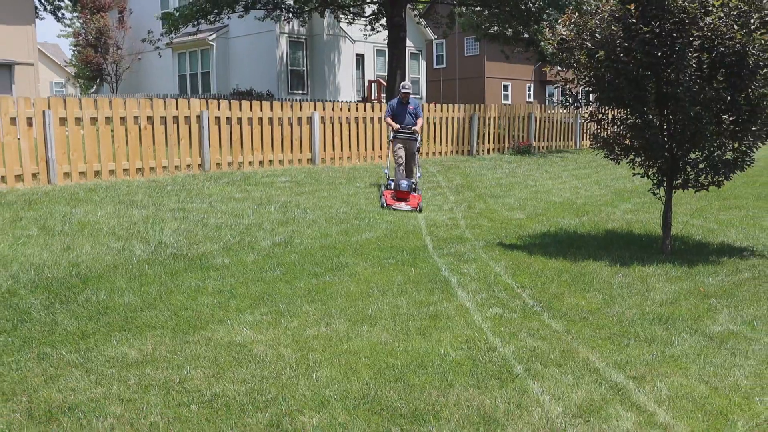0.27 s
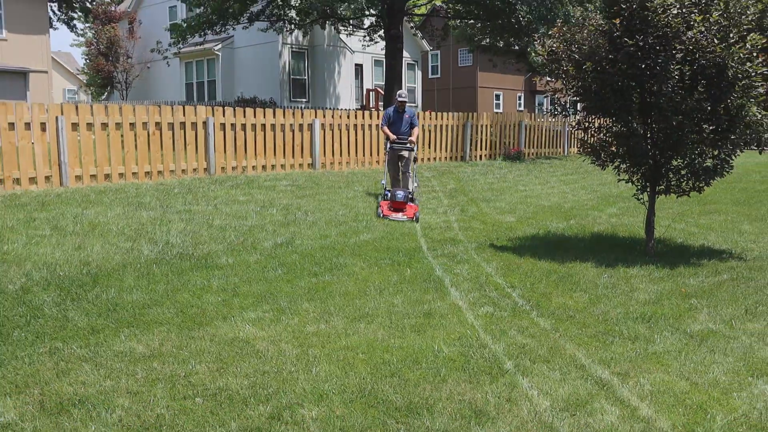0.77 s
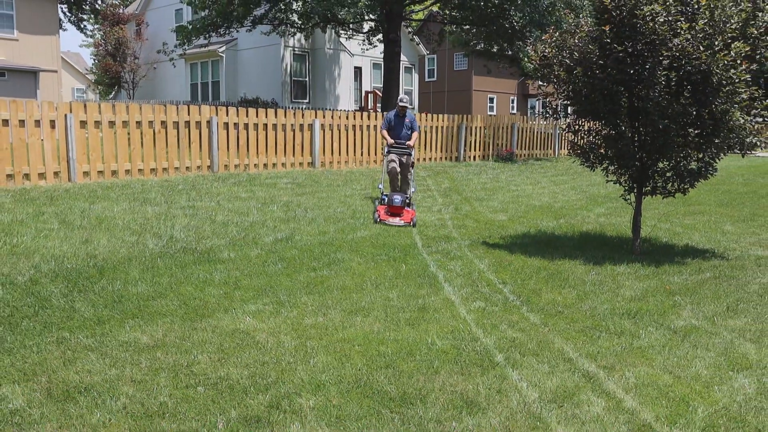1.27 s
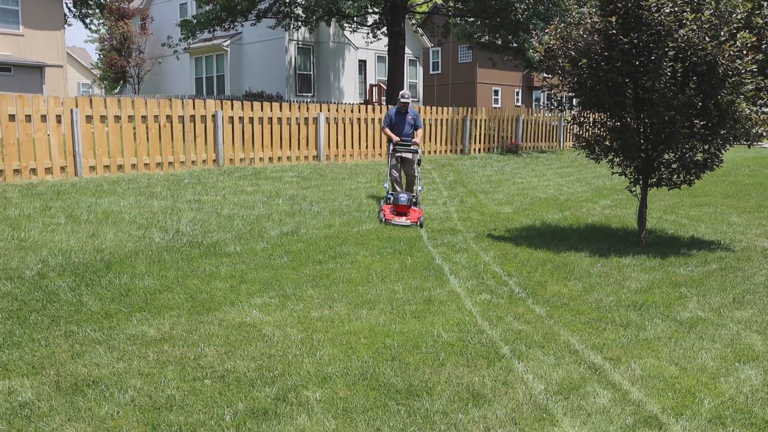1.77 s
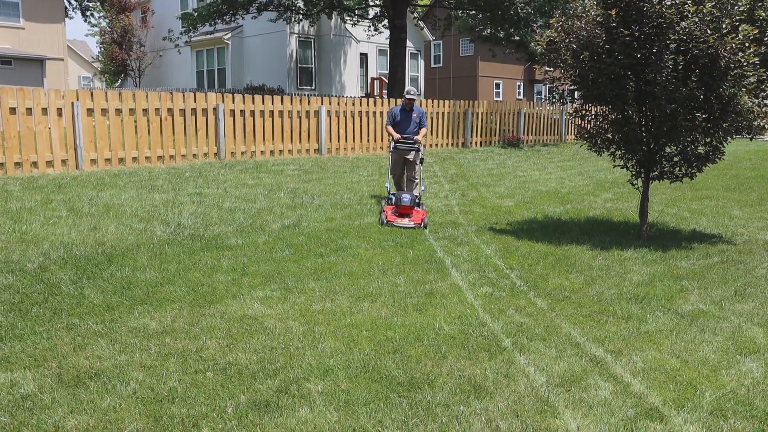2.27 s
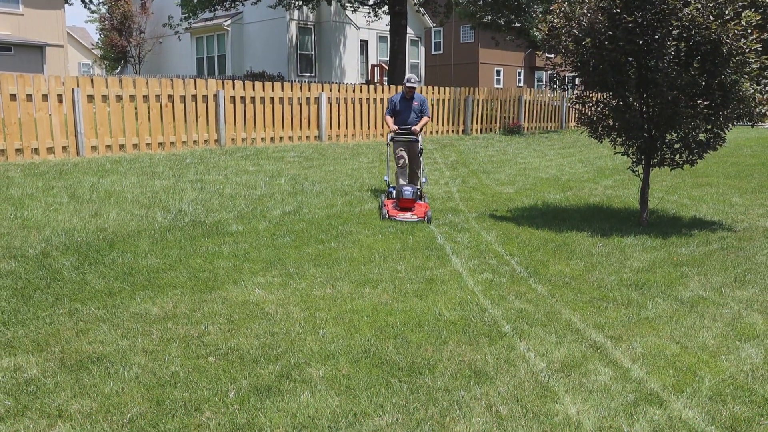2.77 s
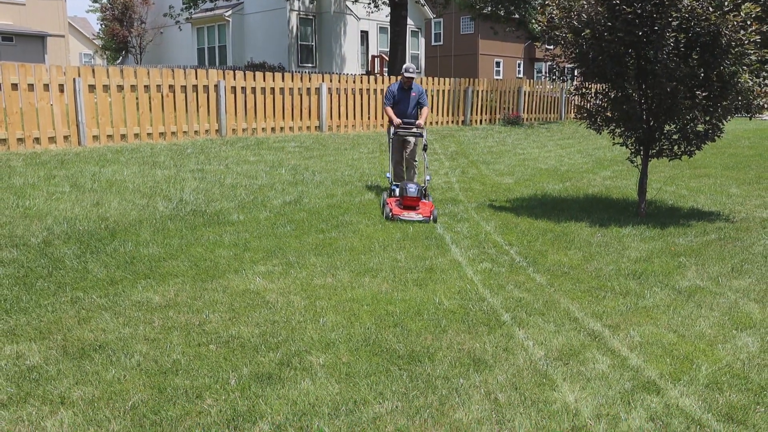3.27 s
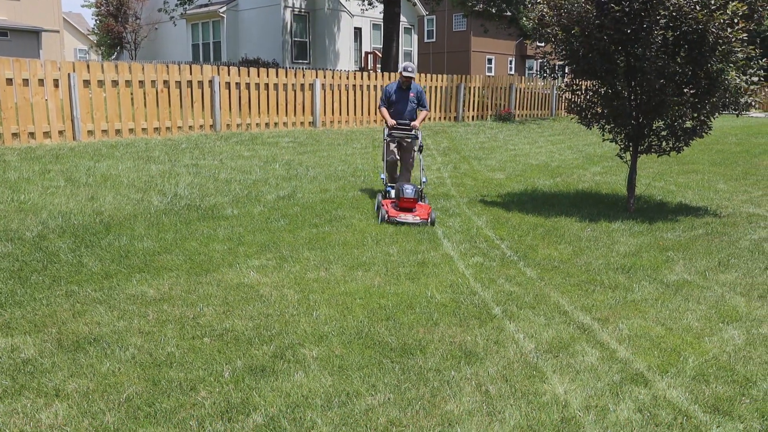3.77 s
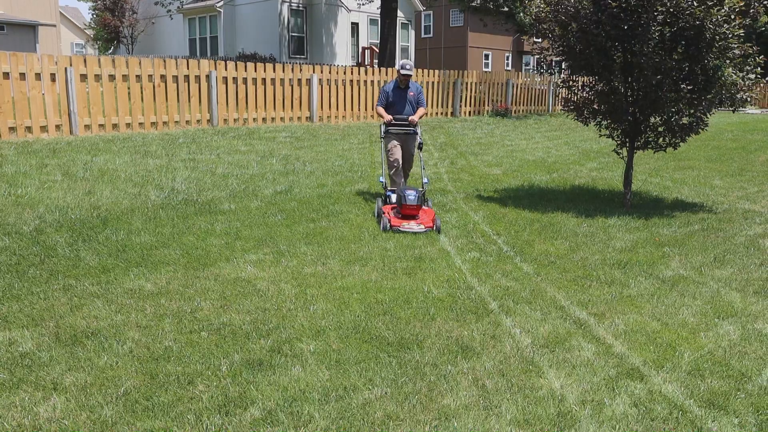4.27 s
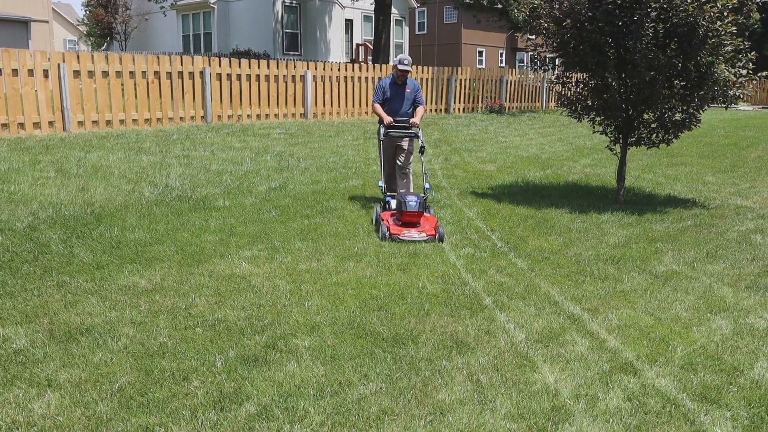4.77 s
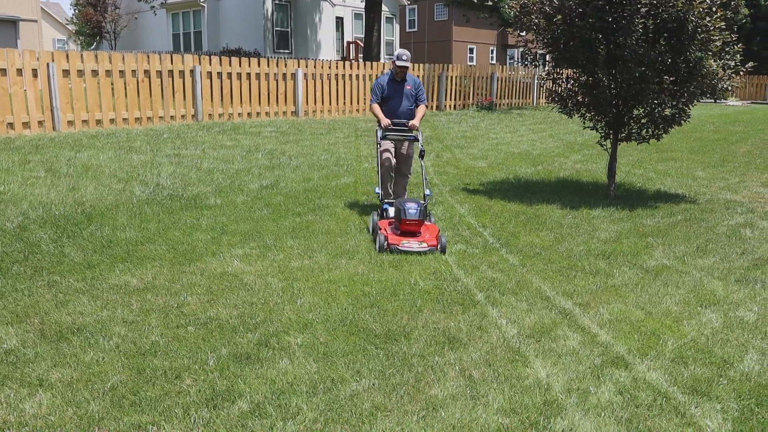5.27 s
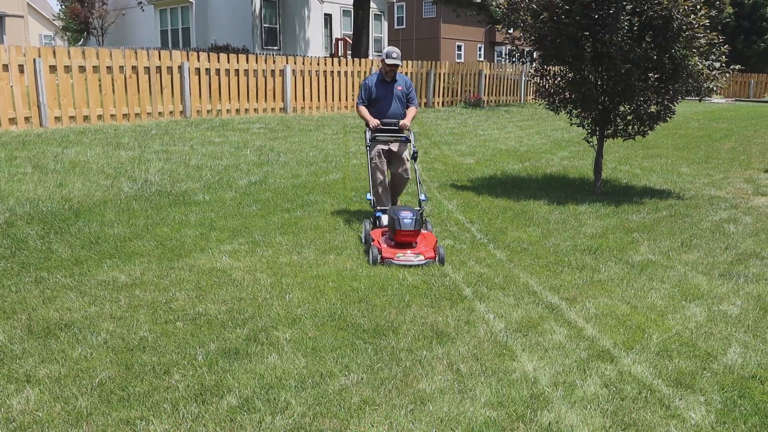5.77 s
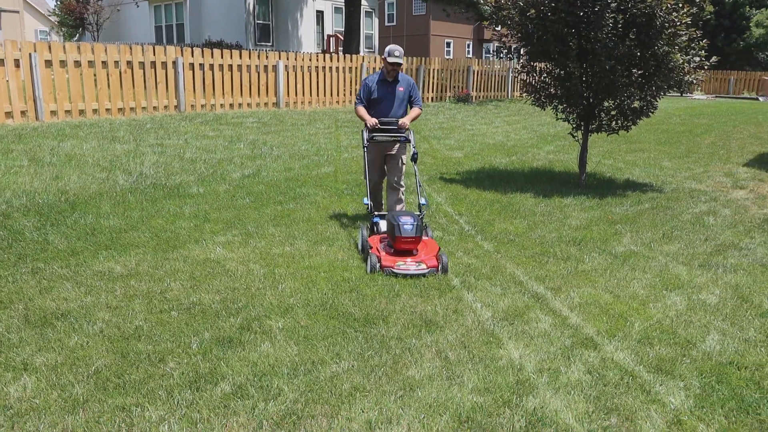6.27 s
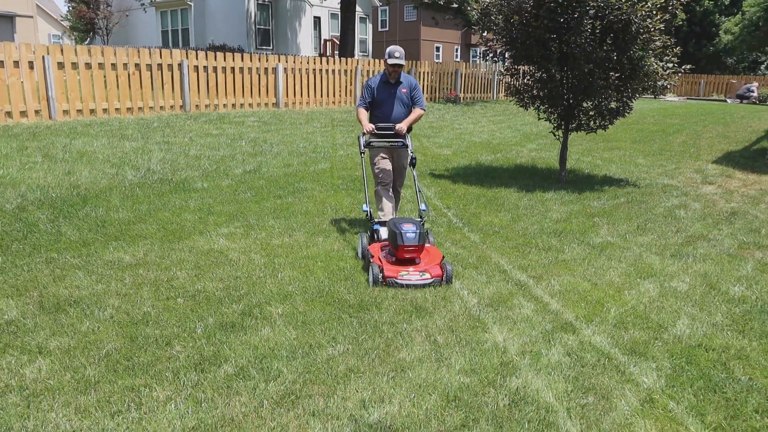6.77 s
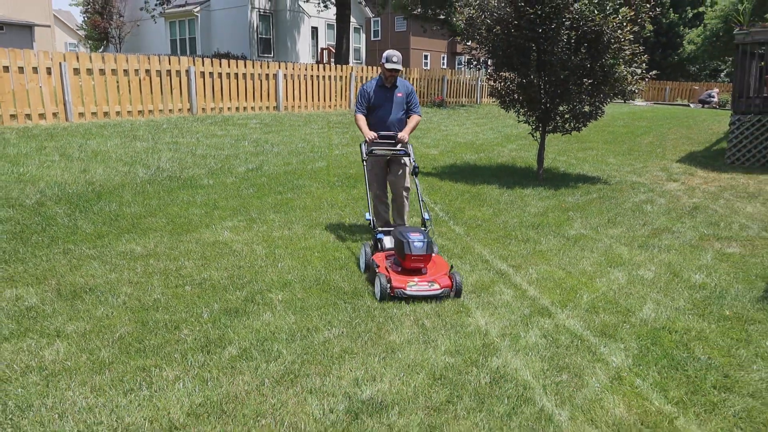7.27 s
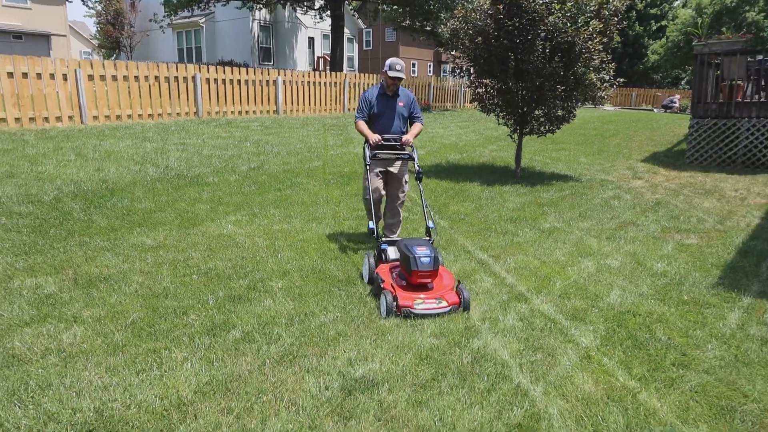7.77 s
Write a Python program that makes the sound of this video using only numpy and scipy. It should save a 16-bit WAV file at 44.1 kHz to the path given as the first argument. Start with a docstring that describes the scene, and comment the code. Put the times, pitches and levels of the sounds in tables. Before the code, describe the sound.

Steady blade hum and airy, shredding roar of an electric mower coming nearer across a back lawn, with low wind thumps and occasional twig knocks.

```python
"""The blade hum and rough, rasping cutting of a battery mower grow louder as it is pushed over a back lawn.
The hum is a stack of tones locked to the blade, with a motor whine above; its pitch dips a little at times.
Noise pulsing with the blade makes the roar of air under the deck, the shredding and the spray of clippings.
Twigs knock, stems snap, puffs of wind buffet the microphone, and a faint steady drone lies under it all."""
import sys
import numpy as np
from scipy import signal
from scipy.fft import rfft, irfft, next_fast_len
from scipy.io import wavfile
from scipy.ndimage import uniform_filter1d, map_coordinates

SR = 44100
rng = np.random.default_rng(int(sys.argv[2]) if len(sys.argv) > 2 else 0)


def log_audio(samples):
    """Write samples as a 16-bit WAV file to the path given in sys.argv[1]."""
    # one column per channel
    frames = np.atleast_2d(samples).T
    # limit to full scale, then quantise
    limited = np.clip(frames, -1, 1)
    pcm = np.round(limited * 32767).astype(np.int16)
    wavfile.write(sys.argv[1], SR, pcm)


N = 353682  # length in samples, about 8 seconds


def amp(db):
    """Turn decibels into a gain."""
    return 10 ** (np.asarray(db) / 20)


def unit(x):
    """Scale x to an rms (average strength) of 1."""
    return x / np.sqrt(np.mean(x ** 2) + 1e-20)


def along(points, hz):
    """Read a table of (Hz, value) points at any frequency, on a log frequency axis."""
    point_hz, value = np.transpose(points)
    return np.interp(np.log(hz + 1), np.log(point_hz + 1), value)


def curves(rows):
    """Draw straight lines between the rows: one curve for each column after the time."""
    seconds, *columns = np.transpose(rows)
    return [np.interp(np.arange(N) / SR, seconds, column) for column in columns]


def wobble(rate):
    """A smooth random curve around zero, drawn through `rate` random points a second."""
    knots = rng.standard_normal(int(N * rate / SR) + 4)
    return map_coordinates(knots, [np.arange(N) * rate / SR])


def bell(s, length):
    """A smooth swell of height 1 at time s; `length` seconds is its width at about a third of that height."""
    return np.exp(-(2 * (np.arange(N) / SR - s) / length) ** 2)


def filtered(x, response):
    """Filter x by a gain that depends on frequency."""
    m = next_fast_len(N + 8192)
    hz = np.fft.rfftfreq(m, 1 / SR)
    return irfft(rfft(x, m) * response(hz), m)[..., :N]


def coloured(x, spectrum):
    """Shape x by a table of (Hz, relative dB), then scale it to rms 1."""
    return unit(filtered(x, lambda hz: amp(along(spectrum, hz))))


def tone(angle, scatter, rate):
    """A steady tone plus its wavering copy, scattered by fence and moving air."""
    waver = wobble(rate) + 1j * wobble(rate)
    partial = (1 + scatter * waver) * np.exp(1j * angle)
    return unit(partial.real)


def patchy_noise(depth_db):
    """Two noises whose shared gain drifts in patches of frequency and time."""
    noise = signal.stft(rng.standard_normal((2, N)), nperseg=512)[2]
    field = rng.standard_normal(noise.shape[1:])
    field = uniform_filter1d(field, size=10, axis=0)  # smooth over frequency
    field = uniform_filter1d(field, size=8, axis=1)  # smooth over time
    patchy = noise * amp(depth_db * unit(field))
    return unit(signal.istft(patchy, nperseg=512)[1][:, :N])


def crackle(rate, scatter_db):
    """Tiny clicks of uneven size at random moments, on average `rate` a second."""
    hit = rng.random(N) < rate / SR
    size = amp(scatter_db * np.minimum(rng.exponential(size=N), 4))
    sign = rng.choice([-1, 1], (2, N))
    return unit(hit * size * sign)


def chop(angle, once, twice, thrice):
    """A gain that rises and falls with each blade pass, as air and grass are struck in bursts."""
    pulse = once * np.cos(angle) + twice * np.cos(2 * angle) + thrice * np.cos(3 * angle)
    return unit(np.exp(pulse))


def spread(pair):
    """Two unrelated signals become left and right: centred, but wide in much of the treble."""
    # How alike left and right are. Each row: frequency in Hz, likeness (1 is the same, 0 is unrelated).
    alike = [(4050, 1), (4500, 0.65), (6000, 0.3), (10100, 0.2), (10350, 1)]

    def mid_and_side(hz):
        turn = np.arccos(np.clip(along(alike, hz), -1, 1)) / 2
        return np.array([np.cos(turn), np.sin(turn)])

    mid, side = filtered(pair, mid_and_side)
    return np.array([mid + side, mid - side]) / np.std(mid)


def drone(hz, db):
    """A faint steady drone, as from a machine at a house nearby: one slightly wavering tone."""
    return amp(db) * tone(2 * np.pi * hz * np.arange(N) / SR, scatter=0.29, rate=4.19)


def eddies(spectrum):
    """Low rumble of turbulent air, evened out in strength."""
    push = coloured(rng.standard_normal(N), spectrum)
    strength = np.sqrt(np.abs(uniform_filter1d(push ** 2, size=2600)) + .05)
    return push / strength


def wind():
    """Slow eddies push on the microphone; each puff swells, dies and adds a quicker flutter."""
    # Tone colour of the slow push and of the flutter. Each row: frequency in Hz, relative level in dB.
    buffet_colour, flutter_colour = [(6, -19), (15, -4), (25, -1.5), (36, -0.5), (50, -9.5), (70, -20.5),
                                     (100, -28), (150, -32), (400, -74), (1500, -90)], [(20, -23), (42, 1.5), (62, 8.5), (85, -2.5),
                                                     (120, -15.5), (200, -25), (500, -31), (1500, -80)]
    # The breeze before its random swings. Each row: time in seconds, buffet level in dB.
    breeze = [(0, -39), (.4, -34), (.8, -46.5), (1.1, -49), (1.42, -28.5), (2.1, -33), (3.05, -28.5),
              (3.6, -46), (4.65, -42), (5.0, -29), (5.2, -37), (5.65, -27), (6.15, -45), (6.5, -38),
              (7.6, -51), (8.02, -50)]
    # Puffs of wind. Each row: peak time in seconds, length in seconds, buffet level in dB,
    # flutter level in dB relative to the buffet.
    puffs = [(0.065, 0.068, -36, -3), (1.22, .06, -29, -15), (1.535, 0.035, -18.5, -8),
             (1.665, 0.057, -20, -2), (1.755, 0.075, -17.5, -4.5), (1.857, 0.059, -22.5, -12),
             (2.037, .06, -24, -15), (2.23, 0.046, -26, -12), (2.352, .06, -20.5, -3.5),
             (2.55, .08, -25, -9), (2.656, 0.035, -18.5, -0.5), (2.832, 0.12, -23, -2.5),
             (3.898, 0.047, -25, -15), (4.116, 0.058, -25.5, -9), (4.255, 0.08, -17, -24),
             (4.37, .05, -27, -18), (4.82, 0.087, -26.5, -20), (6.48, .05, -30, -6)]
    swing_db, swing_rate = 3.5, 14  # lulls and surges: typical size, random points a second
    breeze_flutter_db = -11.5  # relative to the buffet

    breeze_db = curves(breeze)[0] + swing_db * wobble(swing_rate)
    buffet_power = amp(breeze_db) ** 2
    flutter_power = amp(breeze_db + breeze_flutter_db) ** 2
    for s, length, db, flutter_db in puffs:
        puff_power = amp(db) ** 2 * bell(s, length)
        buffet_power = buffet_power + puff_power
        flutter_power = flutter_power + puff_power * amp(flutter_db) ** 2
    buffet = np.sqrt(buffet_power) * eddies(buffet_colour)
    return buffet + np.sqrt(flutter_power) * eddies(flutter_colour)


def snaps(events, spectrum, t60, gain_db):
    """Each snap is a short burst of noise that dies by 60 dB in t60 seconds."""
    t = np.arange(SR // 10) / SR
    envelope = np.zeros(N + len(t))
    for s, db in events:
        envelope[round(s * SR):][:len(t)] += amp(db + gain_db - 60 * t / t60)
    return envelope[:N] * coloured(rng.standard_normal(N), spectrum)


def debris():
    """Twigs knock dully on the deck and stems snap crisply: short bursts of darker and brighter noise."""
    # Twigs flung at the deck, and snapping stems. Each row: start in seconds, level in dB before gain_db.
    twig_hits, stem_snaps = [(4.4752, -32), (6.1923, -20), (6.4464, -21), (7.1776, -23), (7.425, -19)], [(1.0301, -39), (1.8886, -39), (4.1629, -40), (4.3595, -37),
                                            (5.6094, -36), (6.0392, -33), (7.4076, -34)]
    dull = [(400, -20), (900, 14), (3200, -7), (6000, -16.5), (12000, -45)]  # Hz, relative dB
    crisp = [(2000, -20), (4800, 5), (9000, -10), (13000, -12)]
    twigs = snaps(twig_hits, dull, t60=0.046, gain_db=-5.5)
    stems = snaps(stem_snaps, crisp, t60=0.045, gain_db=-7.5)
    return twigs + stems


def spray(angle, spray_db):
    """Clippings patter out in a fine, fluttering hiss: bright noise and clicks, chopped by the blade."""
    # Tone colour of the hiss. Each row: frequency in Hz, relative level in dB.
    hiss_colour = [(2000, -27), (5000, -6.5), (6500, 2), (8200, 1), (10000, -1.5), (11200, -2.5),
                   (12000, -2.5), (13000, -7)]
    patter = patchy_noise(depth_db=1.5) + .25 * crackle(rate=1200, scatter_db=2.5)
    clippings = patter * chop(angle, once=.05, twice=0.034, thrice=.05)
    return amp(spray_db + 1.5 + 1.1 * wobble(40)) * spread(coloured(clippings, hiss_colour))


def deck_roar(angle, gain_db):
    """Air churns under the deck: noise in bursts tied to the blade."""
    # Tone colour of the roar. Each row: frequency in Hz, relative level in dB.
    roar_colour = [(60, -30), (140, -5), (250, -5), (350, -3), (430, -4), (500, -6), (660, -4.5), (760, 0),
                   (860, 0.5), (1000, -5.5), (1150, -8.5), (1600, -16.5), (3000, -25), (6000, -51)]
    roar_db = -29  # level when gain_db and the wobble are 0
    air = rng.standard_normal(N) * chop(angle, once=0.22, twice=0.09, thrice=0.14)
    return amp(roar_db + gain_db + 0.75 * wobble(22)) * coloured(air, roar_colour)


def shredding(angle, shred_db):
    """The edge tears through tufts; close by, more of the upper rasp gets out over the grass."""
    # Tone colour at the far start and near end. Each row: frequency in Hz, relative level in dB.
    far_colour, near_colour = [(500, -9), (1300, -6.5), (1900, 0.5), (2600, -1.5), (3200, -1.5), (3800, -6),
                               (4250, -8), (4600, -5.5), (5200, -10.5), (5700, -16.5), (7000, -26),
                               (13000, -50)], [(500, -15), (1300, 2), (2000, -0.5), (2600, -3),
                                                  (3300, -2), (4200, -8), (4700, -6), (5500, -10),
                                                  (6100, -17.5), (7500, -35), (13000, -50)]
    tearing = patchy_noise(depth_db=1.2) + 0.31 * crackle(rate=1200, scatter_db=3.5)
    cuts = tearing * chop(angle, once=0.032, twice=.05, thrice=0.059)
    close = np.linspace(0, 1, N) ** 3  # 0 is far, 1 is near
    rasp = (1 - close) * coloured(cuts, far_colour) + close * coloured(cuts, near_colour)
    crisp = filtered(rasp, lambda hz: 1 / (1 + (4000 / (hz + 1)) ** 12))  # the part above about 4 kHz
    rasp += crisp * (amp(1.1 * wobble(9)) - 1)  # some tufts tear more crisply than others
    return amp(shred_db - 0.7) * spread(rasp)


def blade_and_motor(angle, near_db):
    """The blade's suction pulses give a stack of tones that swell and fade; the motor whines above most."""
    # The blade's tones. Each row: order (multiple of the blade-pass rate), level in dB when near_db is 0,
    # share of the approach gain, scatter by the yard from 0 to 1.
    blade_tones = [(1, -42.5, 0.23, 0.24), (2, -30, 1.49, 0.21), (3, -27.5, .8, 0.19),
                   (4, -36.5, 1.05, 0.41), (5, -32, 1.02, .22), (6, -37, 1.4, .34), (7, -48.5, 0.73, 0.57),
                   (8, -51.5, 0.66, 0.47), (9, -45, 0.97, 0.47), (10, -45, 1.2, 0.5), (11, -48, 1, 0.4),
                   (13, -51, 1.1, .36)]
    # The motor's whine before its random wobble. Each row: time in seconds, level in dB.
    whine = [(0, -45), (.3, -38), (.62, -44.5), (.95, -38), (1.15, -43), (1.45, -41.5), (1.66, -36),
             (2.05, -46), (2.45, -40.5), (2.8, -36.5), (3.4, -37.5), (3.95, -38), (4.25, -35), (4.7, -37),
             (5.5, -34), (6.8, -34.5), (6.9, -33.5), (8.02, -34.5)]
    whine_order = 12  # multiple of the blade-pass rate
    scatter_rate, fade_rate = 14, 7  # random points a second
    fade_db = 0.86  # typical slow swelling of each tone
    smear = .25  # radians, times (order - 3) squared: the deck rounds off the pulses

    hum = np.zeros(N)
    for order, db, share, scatter in blade_tones:
        k = round(order)
        # odd and even tones are turned against each other: two uneven pulses in each pass
        turn = np.pi + 0.53 * (-1) ** k + smear * max(k - 3, 0) ** 2
        partial = tone(k * angle + turn, scatter, scatter_rate)
        hum += amp(db + share * near_db + fade_db * wobble(fade_rate)) * partial
    whine_db = curves(whine)[0] + 1.4 * wobble(12)
    return hum + amp(whine_db) * tone(whine_order * angle, scatter=0.1, rate=33)


def scene():
    """The mower stays straight ahead as it nears; uneven tufts move its roar, shredding and spray together."""
    # The blade slows a little in thick grass. Each row: time in seconds, blade passes a second.
    speed = [(0, 76.7), (.22, 76.6), (.62, 77.1), (1.3, 76.45), (1.68, 76.9), (2.1, 76.55), (2.67, 76.9),
             (3.15, 76.3), (3.56, 76.85), (4.05, 76.2), (4.9, 77.05), (5.12, 76.6), (5.57, 76.9),
             (6.2, 76.65), (6.7, 76.9), (7.1, 76.55), (7.57, 77.05), (8.02, 76.7)]
    # The mower grows louder as it comes closer. Each row: time in seconds, gain in dB.
    approach = [(0, -8.5), (.7, -7.5), (1.6, -6.5), (1.85, -9.5), (2.2, -6.5), (2.8, -6.5), (3.3, -4.5),
                (4.8, -3.5), (5.5, -2), (6.6, -0.5), (7.4, 0), (8.02, -0.4)]
    # How much grass is cut, before the offsets and wobbles added later.
    # Each row: time in seconds, shredding level in dB, spray level in dB.
    cutting = [(0.0, -46, -65), (0.11, -43.5, -60.5), (1.7, -41.5, -60.5), (1.79, -45.5, -64),
               (2.19, -42.5, -61.5), (2.72, -43, -62), (3.55, -39, -56.5), (3.91, -39.5, -61),
               (4.04, -39.5, -57.5), (5.54, -38, -59), (5.6, -37, -53), (5.67, -38.5, -59),
               (7.01, -35.5, -56), (7.19, -36, -59), (7.37, -34.5, -57.5), (8.02, -38, -59.5)]
    # Thick tufts swell the roar and the rasp. Each row: peak time in seconds, length in seconds, rise in dB.
    thick_tufts = [(1.653, .08, 1), (3.37, .08, 1), (5.854, 0.064, 1), (6.452, 0.076, 3)]

    passes_hz, = curves(speed)
    near_db, = curves(approach)
    shred_db, spray_db = curves(cutting)
    angle = 2 * np.pi * np.cumsum(passes_hz) / SR  # one full turn of this angle is one blade pass
    tufts = wobble(9)
    thick_db = sum(db * bell(s, length) for s, length, db in thick_tufts)

    background = drone(hz=102.8, db=-49.5) + wind()
    roar = deck_roar(angle, near_db + thick_db + 0.2 * tufts)
    clippings = spray(angle, spray_db + 0.46 * tufts)
    rasp = shredding(angle, shred_db + thick_db + 0.35 * tufts)
    return background + debris() + roar + clippings + rasp + blade_and_motor(angle, near_db)


def record(dry):
    """The two channels differ very slightly in sensitivity; nothing is kept above the band limit."""
    # How far each channel strays, left down and right up.
    # Each row: frequency in Hz, size of the stray part in dB relative to the sound itself.
    stray = [(40, -38), (100, -45), (200, -53), (400, -55.5), (1000, -59.5), (3000, -50), (11000, -40)]
    top_hz = 13150

    def response(hz):
        sensitivity = 1 + np.array([[-1], [1]]) * amp(along(stray, hz))
        return sensitivity * (hz < top_hz)

    return filtered(dry, response)


dry = scene()
out = record(dry)
log_audio(out)
```